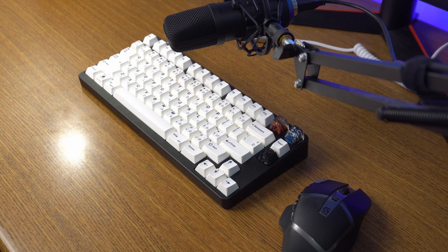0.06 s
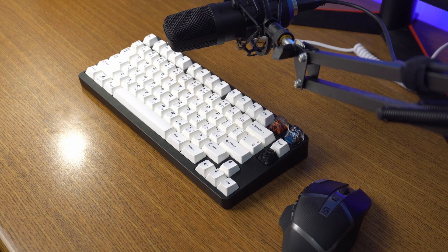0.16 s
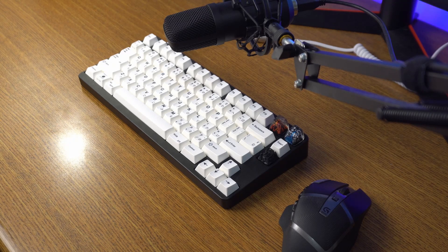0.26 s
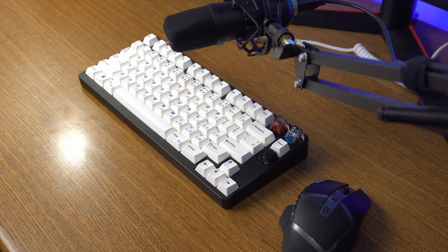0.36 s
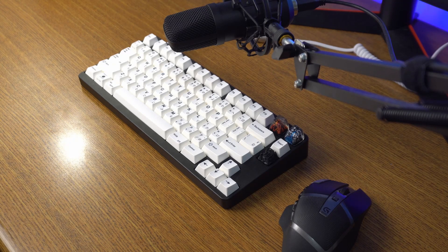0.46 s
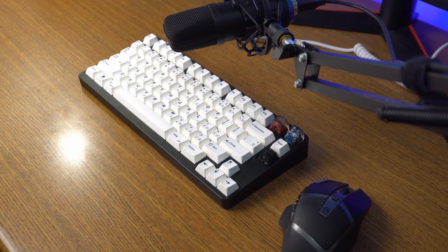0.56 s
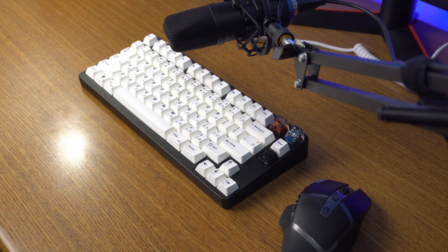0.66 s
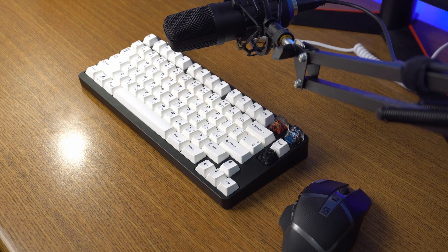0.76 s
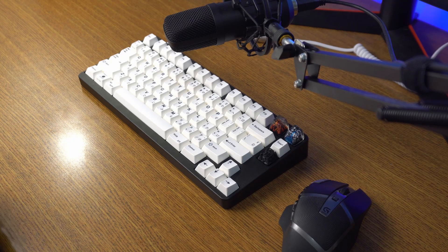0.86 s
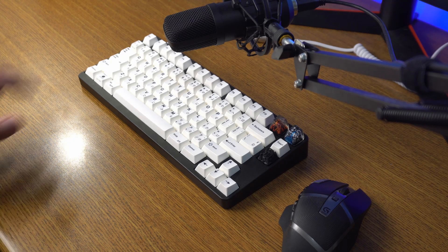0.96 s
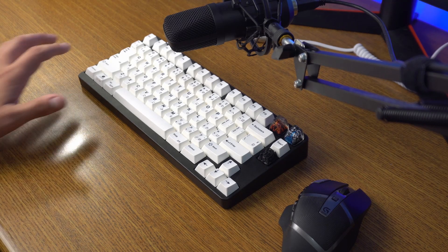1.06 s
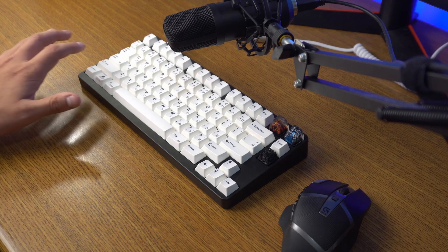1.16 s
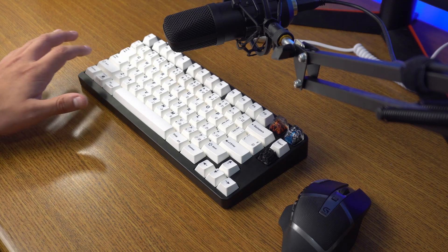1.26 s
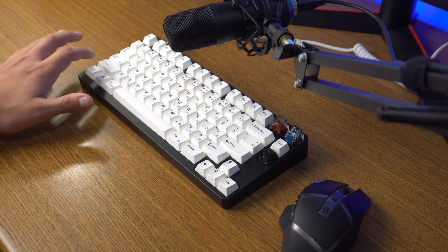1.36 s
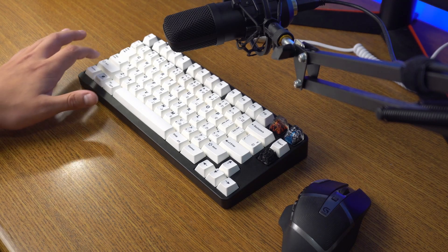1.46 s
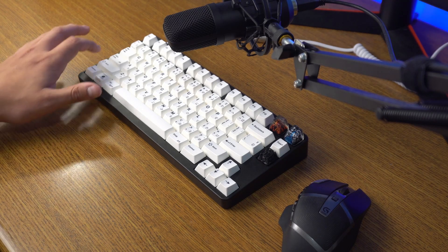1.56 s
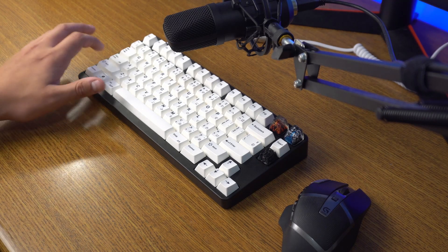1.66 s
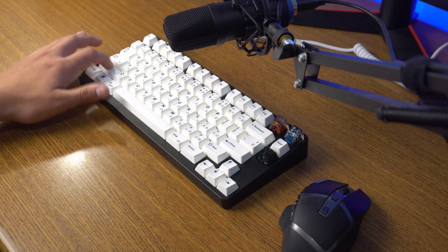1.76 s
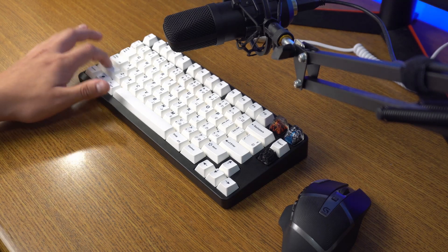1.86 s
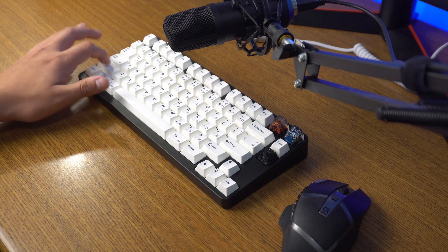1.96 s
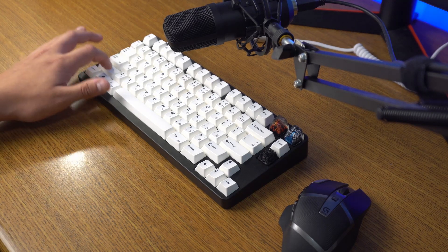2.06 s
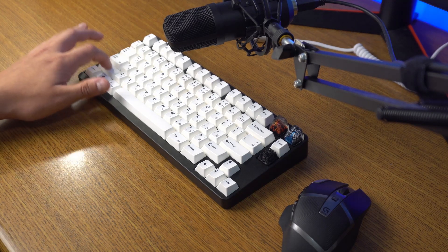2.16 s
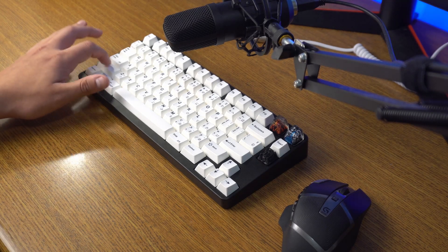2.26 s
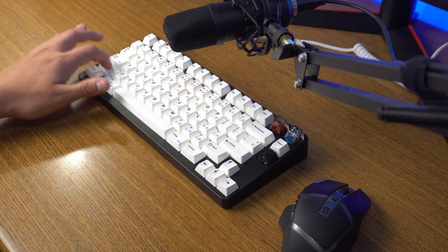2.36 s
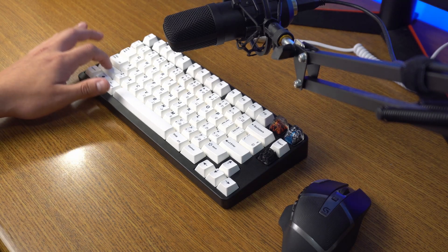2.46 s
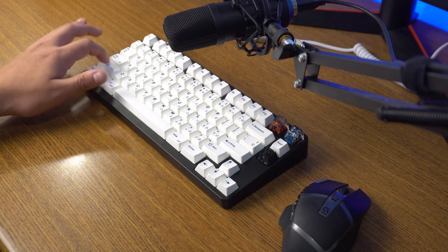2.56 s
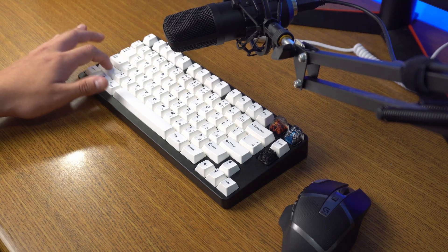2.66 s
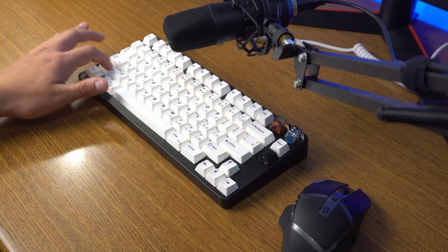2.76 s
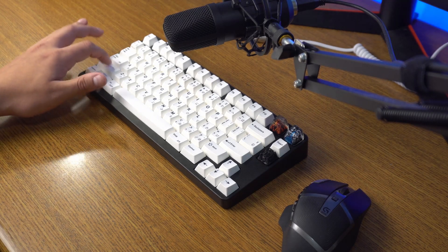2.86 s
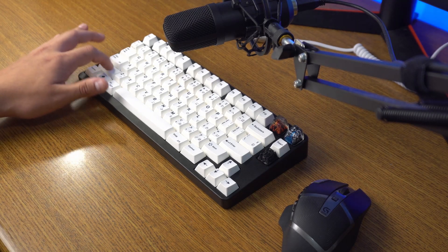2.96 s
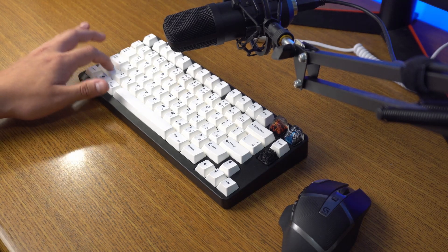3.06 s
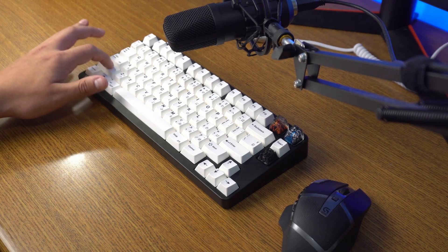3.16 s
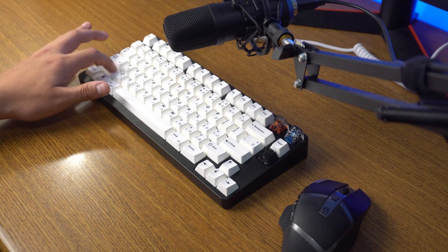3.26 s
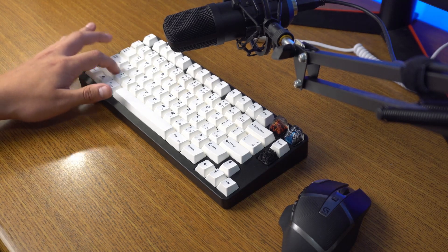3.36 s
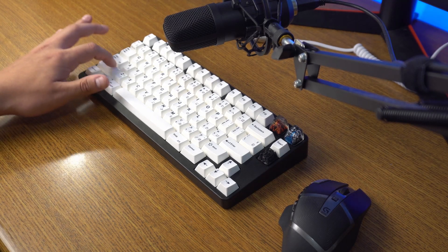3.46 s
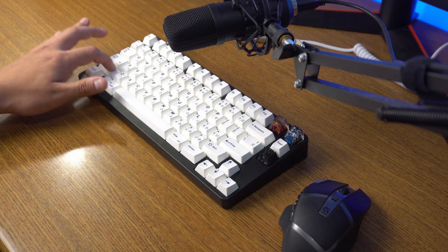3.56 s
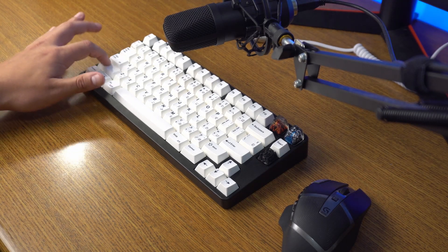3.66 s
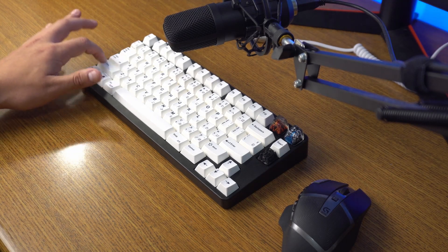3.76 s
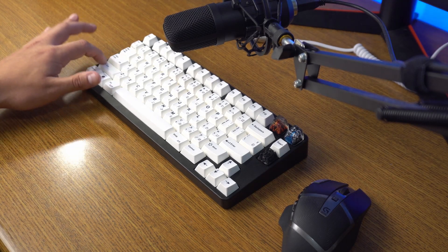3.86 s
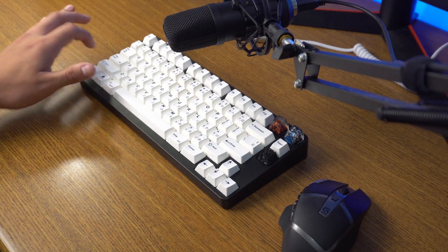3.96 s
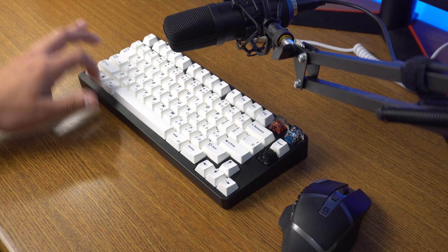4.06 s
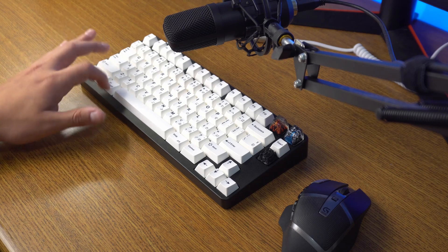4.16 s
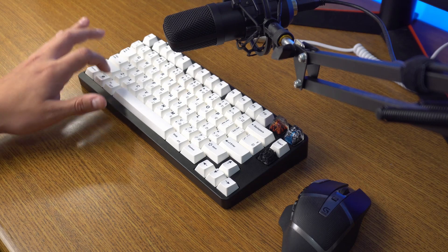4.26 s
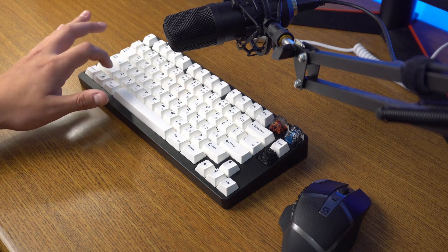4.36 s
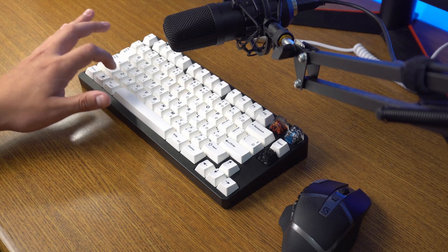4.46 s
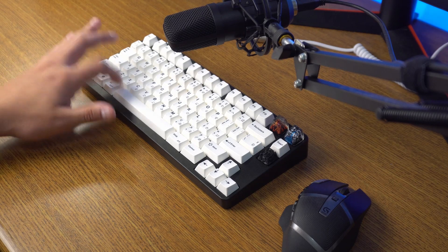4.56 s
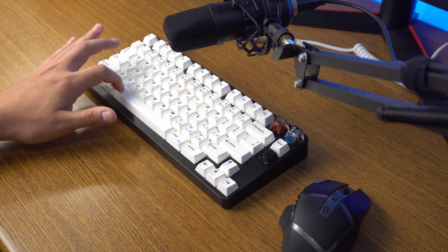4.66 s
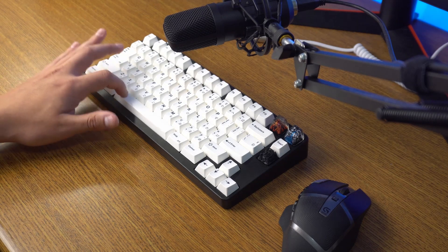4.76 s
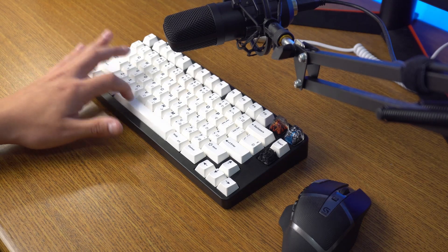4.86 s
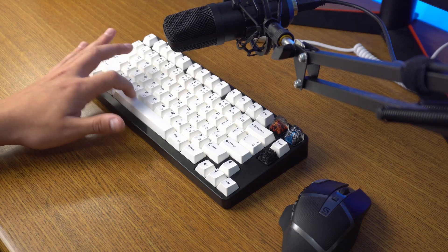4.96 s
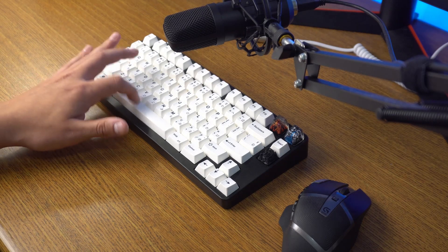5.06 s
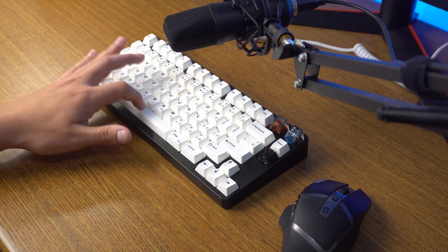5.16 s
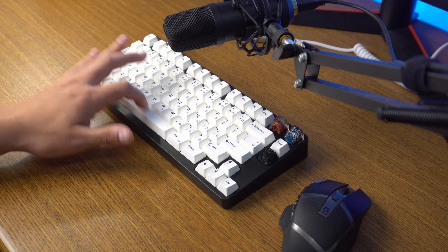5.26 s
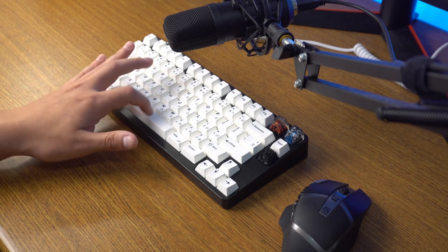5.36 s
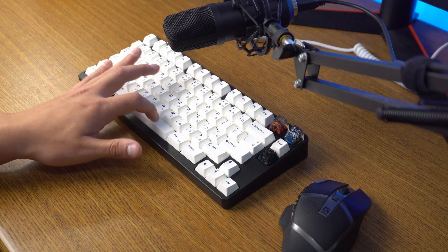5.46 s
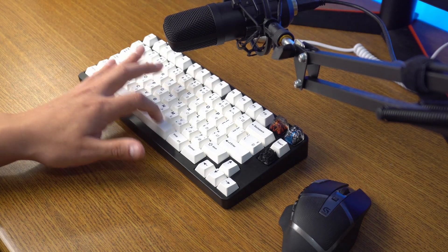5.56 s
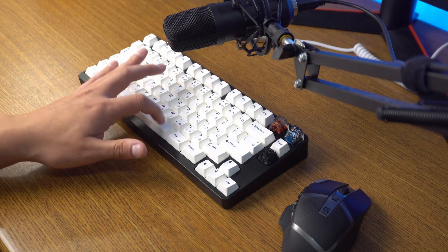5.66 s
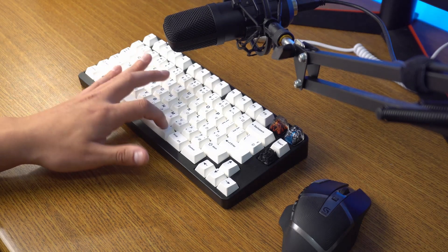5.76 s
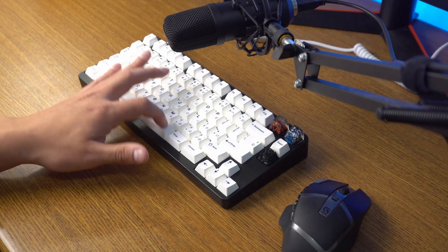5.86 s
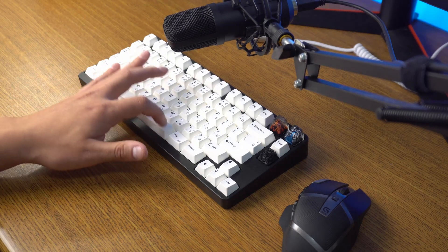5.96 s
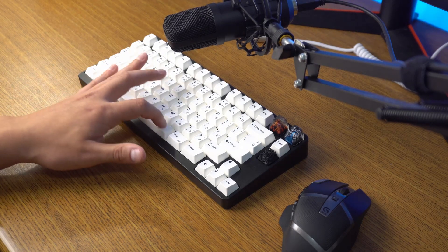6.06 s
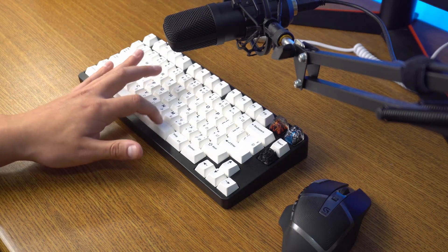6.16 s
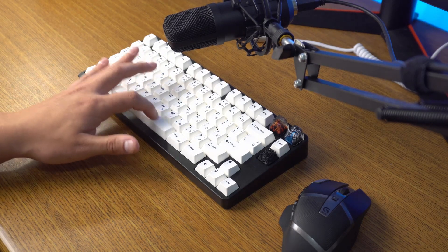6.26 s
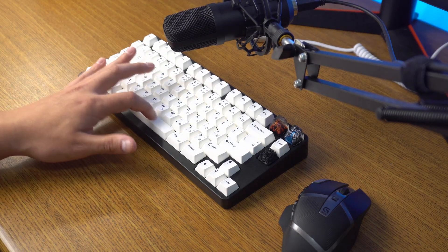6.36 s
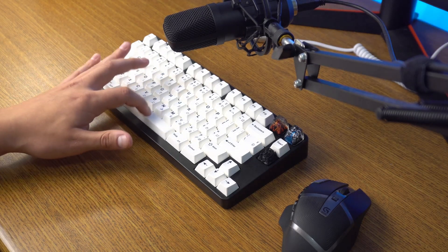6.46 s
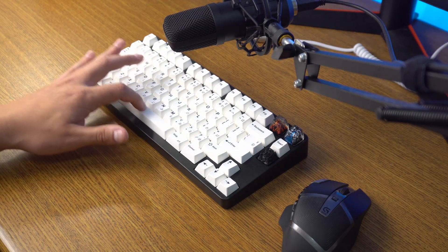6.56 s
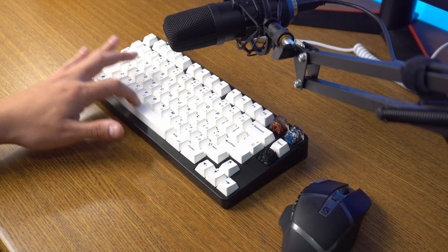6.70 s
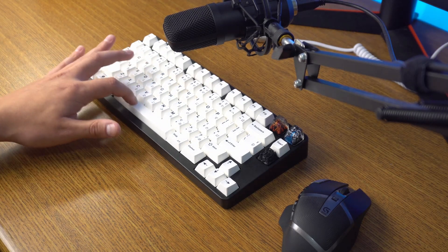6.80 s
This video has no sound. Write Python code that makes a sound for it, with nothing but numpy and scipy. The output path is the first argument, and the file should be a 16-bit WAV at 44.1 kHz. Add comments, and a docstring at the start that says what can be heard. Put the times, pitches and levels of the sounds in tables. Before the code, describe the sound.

One hand taps a mechanical keyboard close up, a steady run on a wide edge key, a short pause, then brisk letter keys with soft clacks.

```python
"""At a desk in a small room, close up: one hand taps a mechanical keyboard with linear switches.
A burst of strokes on a wide key at the edge comes first, then one on letter keys, about seven a second.
Fingertips rattle the caps on landing and lift; caps bottom out with a noise-burst clack, ringing plate and
case, and spring back. Shaped noise makes the rubbing, rustle, desk wobble and room air; sines hum faintly
and damped sines sway the desk; sparse random reflections make the room."""
import sys
import numpy as np
from scipy import signal
from scipy.fft import rfft, irfft
from scipy.io import wavfile
from scipy.ndimage import uniform_filter1d

SR = 44100
rng = np.random.default_rng(int(sys.argv[2]) if len(sys.argv) > 2 else 0)


def to_wav(s):
    """Save 16-bit WAV."""
    ch = np.atleast_2d(s).T  # columns
    pcm = np.round(np.clip(ch, -1, 1) * 32767)  # PCM
    wavfile.write(sys.argv[1], SR, pcm.astype(np.int16))


N = 301203
TIME = np.arange(N) / SR
AGE = np.arange(4096) / SR  # time axis of one blow, s
HIT_S = 0.02  # the level of a blow is its rms over this time
LETTERS_FROM_S = 4.3  # the hand moves from the wide key to the letters

# keys bottoming out: [t/s, relative cap level/dB, cap resonance f/Hz, plate level/dB,
# travel since the fingertip landed/s]
KEY_PRESSES = [(1.8047, -30.5, 1600, -37, .006), (1.9544, -39.5, 2620, -46, 0.023),
               (2.0955, -38.5, 2620, -43, 0.021), (2.2383, -38, 1970, -42, .018),
               (2.3849, -38, 1760, -42.5, 0.021), (2.5352, -38, 2720, -46, 0.02),
               (2.6925, -37, 1760, -43, 0.016), (2.829, -39, 1930, -40, 0.02),
               (2.9977, -36, 2800, -43, .019), (3.1386, -41.5, 1870, -41.5, 0.026),
               (3.292, -42, 1810, -39.5, 0.031), (3.4284, -37.5, 1920, -44.5, 0.028),
               (3.5894, -34, 1880, -41, 0.016), (3.757, -42, 2770, -51, 0.029),
               (3.8906, -38.5, 2820, -54, 0.02), (4.663, -35, 2750, -35.5, 0.01),
               (4.801, -39.5, 2700, -37, 0.011), (4.9443, -35.5, 2780, -38, 0.02),
               (5.0847, -35.5, 1830, -38, 0.017), (5.232, -26, 2020, -40, 0.0081),
               (5.3766, -35, 2640, -41.5, 0.022), (5.5194, -35.5, 2520, -39.5, 0.011),
               (5.6746, -36.5, 2770, -38.5, 0.011), (5.8155, -35.5, 2650, -38.5, 0.021),
               (5.9663, -37, 3000, -38.5, 0.023), (6.1129, -36.5, 2830, -37, 0.026),
               (6.2595, -38.5, 2980, -39, 0.013), (6.4037, -40.5, 2740, -40, 0.012),
               (6.5538, -38, 2800, -40.5, 0.028), (6.6957, -40, 1850, -42.5, 0.032)]
# keys springing back to the top stop: [t/s, relative cap level/dB, relative tick level/dB,
# travel since the finger let go/s]
KEY_RELEASES = [(1.873, -50, -54, 0.018), (2.021, -58.5, -73, 0.022), (2.1617, -50.5, -57, 0.014),
                (2.316, -54, -60, 0.023), (2.462, -52.5, -72, 0.016), (2.6087, -50.5, -50, 0.017),
                (2.917, -57.5, -70, .029), (3.0682, -55.5, -74, 0.015), (3.2216, -58.5, -73, .023),
                (3.3589, -52, -57, 0.017), (3.503, -49.5, -54.5, 0.017), (3.6679, -51.5, -66, 0.011),
                (3.833, -66, -88, .024), (3.9625, -46, -42, 0.016), (4.7228, -47, -64, 0.012),
                (4.8603, -44, -53.5, 0.014), (5.0048, -42.5, -52, 0.0091), (5.144, -41, -47, 0.0094),
                (5.2882, -41.5, -38.5, 0.014), (5.4425, -42.5, -57, 0.011), (5.584, -40.5, -56, .011),
                (5.737, -42, -50, 0.015), (5.8842, -40, -51.5, 0.014), (6.0353, -44, -56.5, 0.019),
                (6.1849, -45, -63, 0.015), (6.3176, -52, -62, 0.01), (6.4614, -52, -69, 0.013),
                (6.4769, -46.5, -66, 0.017), (6.625, -61, -65, .014), (6.776, -45.5, -59.5, 0.012)]
# modes of the switch plate, before detuning and sustain: [f/Hz, relative level/dB, t60/s]
PLATE_MODES = [(1074, -1.5, 0.038), (1208, -2.5, 0.026), (1325, -5.5, 0.043)]

# cap levels of an ordinary stroke, dB; pairs are (wide key, letter key) throughout
PRESS_DB, RELEASE_DB = -37.5, (-52, -40)


def amp(db):
    """Turns decibels into a linear gain."""
    return 10 ** (np.asarray(db) / 20)


def read(points, hz):
    """Joins (Hz, value) points on a log-frequency axis."""
    f, value = np.transpose(points)
    return np.interp(np.log(hz + 1), np.log(f + 1), value)


def unit(x):
    """Scales to energy 1."""
    return x / (np.linalg.norm(x) + 1e-20)


def sized(x, db):
    """Brings one blow to its level."""
    return unit(x) * amp(db) * np.sqrt(HIT_S * SR)


def add(mix, s, sound):
    """Lays a sound into the mix from time s, cut at the end."""
    part = mix[round(s * SR):][:len(sound)]
    part += sound[:len(part)]


def coloured(x, db):
    """Minimum-phase filter, so the energy stays early, with a gain in dB for each frequency bin."""
    log_gain = np.log(amp(np.r_[db, db[-2:0:-1]]))
    response = np.exp(np.conj(signal.hilbert(log_gain)))[:len(db)]
    return irfft(rfft(x) * response)


def noise(colour):
    """Noise of rms 1 with a given spectrum."""
    spectrum = rfft(rng.standard_normal(N))
    gain = amp(read(colour, np.fft.rfftfreq(N, 1 / SR)))
    return unit(irfft(spectrum * gain, N)) * np.sqrt(N)


def level(rows):
    """Gain over time from (s, dB) rows, silent outside them."""
    s, db = np.transpose(rows)
    return amp(np.interp(TIME, s, db, left=-200, right=-200))


def for_key(pair, s):
    """Picks the value for the key in use at time s."""
    return pair[int(s > LETTERS_FROM_S)]


def of_key(table, s):
    """Picks the colour of the key in use at time s."""
    return np.array(table)[:, [0, for_key((1, 2), s)]]


def hum():
    """Mains hum: steady sines with random starting phases."""
    # [f/Hz, rms level/dB]
    hum_tones = [(60, -67.5), (120, -67), (240, -75.5)]
    out = np.zeros(N)
    for hz, db in hum_tones:
        out += amp(db) * np.sqrt(2) * np.sin(2 * np.pi * (hz * TIME + rng.random()))
    return out


def air():
    """Room air: a steady bed of shaped noise."""
    # [f/Hz, relative level/dB]
    air_colour = [(90, -8), (160, -12.5), (270, -6), (335, -15.5), (470, -13), (800, -23.5), (1500, -28),
                  (4000, -36), (16000, -38)]
    return amp(-66.5) * noise(air_colour)


def wobble():
    """Desk and microphone arm wobble: low noise that swells and sinks."""
    # [t/s, relative level/dB]
    wobble_course = [(0, -61.5), (1.2, -56.5), (1.72, -63), (1.82, -45.5), (2.4, -51.5), (3.95, -51),
                     (4.55, -55.5), (4.68, -45.5), (6.83, -55.5)]
    # [f/Hz, relative level/dB]
    wobble_colour = [(10, 3), (20, 4), (27, -10.5), (36, -12.5), (50, -7.5), (64, -11), (90, -13),
                     (130, -26.5), (250, -75.5)]
    return amp(2.4) * noise(wobble_colour) * level(wobble_course)


def background():
    """Sums desk wobble, room air and mains hum."""
    return wobble() + air() + hum()


def room(x, first_s=0.0046):
    """Sparse reflections of random sign and size, each band dying at its own speed."""
    # [f/Hz, t60/s]
    room_decay = [(300, 0.62), (1500, 0.32), (4000, 0.34), (8000, 0.37), (15000, 0.19)]
    t = np.arange(SR // 2) / SR
    # reflections per second grow with time, and each gets weaker to match
    density = 900 + 40000 * t
    struck = (rng.random(len(t)) < density / SR) * (t > first_s)
    taps = rng.standard_normal(len(t)) * struck / np.sqrt(density)
    hz, age, bands = signal.stft(taps, SR, nperseg=256)
    decay = amp(-60 * age / read(room_decay, hz)[:, None])
    tail = signal.istft(bands * decay, SR, nperseg=256)[1]
    return signal.fftconvolve(x, unit(tail))[:N]


def reflections(x, count=4):
    """Successive strokes cycle through a few random reflection patterns, so the room tail varies."""
    stroke = np.searchsorted([press[0] - HIT_S for press in KEY_PRESSES], TIME)
    return sum(room(x * (stroke % count == k)) for k in range(count))


def desk():
    """Every press pushes the desk, which sways on in slow dying modes."""
    # before detuning: [f/Hz, relative level/dB, t60/s]
    desk_modes = [(28.3, -51.5, 0.28), (61.3, -55, .25)]
    t, out = np.arange(SR // 2) / SR, np.zeros(N)
    for press in KEY_PRESSES:
        force, detune = rng.standard_normal(2)
        sway = np.zeros(len(t))
        for hz, db, t60 in desk_modes:
            sway += amp(db - 60 * t / t60) * np.sin(2 * np.pi * hz * (1 + 0.12 * detune) * t)
        add(out, press[0], amp(12.0 + 1.6 * force) * sway * (1 - np.exp(-t / 0.0016)))
    return out


def contact(chatter_db, t60, crack_s, spread=0.37):
    """A sharp crack, then the small fast rebounds of plastic on plastic."""
    crack_noise, chatter_noise = rng.standard_normal((2, len(AGE)))
    crack = (AGE == 0) + spread * crack_noise * np.exp(-AGE / crack_s)
    chatter = chatter_noise * amp(-60 * AGE / t60) * (1 - np.exp(-AGE / 0.00076))
    return unit(crack) + amp(chatter_db) * unit(chatter)


def keycap(s, cap_db, tick_db, chatter_db, t60, cap_hz, peak_db, width_hz=200, tick_chatter_db=-2):
    """The contact rings the hollow cap; its hard edge gives a shorter tick."""
    # colour of the cap: [f/Hz, wide key level/dB, letter key level/dB]
    cap_colour = [(835, -45.5, -34.5), (1004, -5, -9.5), (1430, -5, -7.5), (1920, -1.5, -3),
                  (2220, -3, -3.5), (2470, -7, -3.5), (3000, -3.5, -2), (3520, -6, -9.5), (4433, -14.5, -9),
                  (5560, -35.5, -36)]
    # colour of the hard plastic contact: [f/Hz, wide key level/dB, letter key level/dB]
    tick_colour = [(2800, -9, -23), (3960, 2, -0.5), (5510, -0.5, -1.5), (5260, -3.5, -7), (7180, -5.5, -1),
                   (9330, -9, -5.5), (10000, -6.5, -14), (11240, -18, -4.5), (11700, -17.5, -14),
                   (15100, -22.5, -12), (16200, -29.5, -23)]
    hz = np.fft.rfftfreq(len(AGE), 1 / SR)
    cavity = peak_db / (1 + ((hz - cap_hz) / width_hz) ** 2)
    # a wide key lands on its stem and stabilisers not quite at once, so its crack lasts longer
    crack_s = for_key((0.0006, 0.00025), s)
    cap_contact = contact(chatter_db, t60, crack_s)
    clack = coloured(cap_contact, read(of_key(cap_colour, s), hz) + cavity)
    edge_contact = contact(chatter_db + tick_chatter_db, t60 * 0.92, crack_s)
    tick = coloured(edge_contact, read(of_key(tick_colour, s), hz))
    return sized(clack, cap_db) + sized(tick, tick_db)


def ring(modes, rise_s, scatter_db=2):
    """Dying modes, excited and tuned a little differently on each blow."""
    hz, db, t60 = np.transpose(modes)[:, :, None]
    weight, detune = rng.standard_normal((2, len(modes), 1))
    envelopes = amp(db + scatter_db * weight - 60 * AGE / t60)
    waves = envelopes * np.sin(2 * np.pi * hz * (1 + 0.016 * detune) * AGE)
    return unit(waves.sum(0) * (1 - np.exp(-AGE / rise_s)))


def plate(hz, delay_s, ring_db, sustain=1, focus_db=0, width_s=0.0016, fall=0.12):
    """A bending wave crosses the plate, high notes first, and leaves its modes ringing."""
    passing = (AGE - delay_s) / width_s
    turns = np.cumsum(hz * (1 - fall * np.tanh(passing / 2))) / SR
    swell = (1 - np.exp(-AGE / 0.000302)) / np.cosh(np.clip(passing, -20, 20))
    wave = np.sin(2 * np.pi * turns) * swell
    # focus_db weakens modes per octave of distance from the wave's pitch
    modes = [(f, db - focus_db * abs(np.log2(f / hz)), t60 * sustain) for f, db, t60 in PLATE_MODES]
    late = np.interp(AGE - delay_s, AGE, ring(modes, 0.0027), left=0)
    return unit(wave) + amp(ring_db) * unit(late)


def case(s, rise_s, low_hz=365, high_hz=740):
    """The case on the desk thuds: its dying modes build up briefly and pass one narrow band."""
    # before detuning: [f/Hz, wide key level/dB, letter key level/dB, t60/s]
    case_modes = [(412, -5, -1.5, 0.051), (445, -13, 1, 0.02), (533, -3.5, -1.5, 0.032),
                  (675, 6.5, 2, 0.02)]
    hz, wide_db, letter_db, t60 = np.transpose(case_modes)
    modes = np.transpose([hz, for_key((wide_db, letter_db), s), t60])
    band = signal.butter(2, [low_hz, high_hz], "bandpass", fs=SR, output="sos")
    return signal.sosfilt(band, ring(modes, rise_s))


def push(soft_s=0.00097):
    """The dull, ringless shove of the finger's weight on the case."""
    u = AGE / soft_s
    return u * (2 - u) * np.exp(-u)


def rattle(s, cap_db, tick_db):
    """A loose cap rattles on its stem and faintly stirs the plate."""
    # the stabilised wide key rattles briefly, a letter cap for longer
    t60, chatter_db = for_key((0.023, 0.03), s), for_key((3.5, 13), s)
    cap = keycap(s, cap_db - 1.3, tick_db - 1.3, chatter_db, t60, cap_hz=3090, peak_db=11.0)
    return cap + sized(ring(PLATE_MODES, 0.000948), cap_db - 14.5)


def approach():
    """A faint shaped-noise rustle and one dry contact tick as the hand comes in."""
    # [t/s, level/dB]
    rustle_course = [(.6, -90), (.8, -79), (1.05, -79), (1.35, -77), (1.6, -90)]
    # [f/Hz, relative level/dB]
    rustle_colour = [(200, -13), (600, 3), (1200, -6), (2600, -14), (5000, -18), (15000, -24)]
    # [f/Hz, relative level/dB]
    dry_tick_colour = [(400, -18), (900, 2), (2000, -8), (6000, -4), (15000, -10)]
    out = noise(rustle_colour) * level(rustle_course)
    hz = np.fft.rfftfreq(len(AGE), 1 / SR)
    tick = coloured(contact(chatter_db=3, t60=0.03, crack_s=0.00054), read(dry_tick_colour, hz))
    add(out, 1.254, sized(tick, -66))
    return out


def fingers(grain_db=3, drag_grain_db=3.0):
    """Grainy rubbing of stems and fingers as keys go down and are held, and one duller drag over a cap."""
    # rubbing level over the two bursts of strokes: [t/s, relative level/dB]
    rub_course = [(1.79, -64), (2.7, -63.5), (3.15, -67.5), (3.65, -65.5), (3.97, -64), (4.7, -75),
                  (5.25, -64.5), (5.9, -71), (6.82, -73)]
    # rubbing within each stroke: [t from the press/s, relative level/dB]
    stroke_course = [(-.035, -29), (-.015, 6.5), (.01, 3.5), (.07, 1.5), (.11, -14.5)]
    # [f/Hz, relative level/dB]
    rub_colour = [(300, -2.5), (850, -14.5), (1250, -14.5), (1700, -3.5), (2200, -8.5), (2600, -12),
                  (3100, -9.5), (4500, -9.5), (8000, -20), (15000, -28.5)]
    # [t/s, relative level/dB]
    drag_course = [(5.9, -63.5), (5.975, -50.5), (6.02, -54), (6.07, -58), (6.13, -63)]
    # [f/Hz, relative level/dB]
    drag_colour = [(120, -9), (300, -6), (700, -7.5), (1300, -13), (2200, -22), (5000, -53)]
    # the grain flutters the level over about 3 ms
    grain = unit(uniform_filter1d(rng.standard_normal(N), size=130)) * np.sqrt(N)
    age, db = np.transpose(stroke_course)
    stroke = amp(np.interp(np.arange(age[0], age[-1], 1 / SR), age, db))
    moving = np.zeros(N)
    for press in KEY_PRESSES:
        add(moving, press[0] + age[0], stroke)
    rub = noise(rub_colour) * amp(grain_db * grain + 1.5) * level(rub_course) * moving
    drag = noise(drag_colour) * amp(drag_grain_db * grain - 0.5) * level(drag_course)
    return rub + drag


def touches(land_follows=0.9, lift_follows=(0.15, 0.55)):
    """Caps rattle as fingertips land and let go, following each stroke's force, and when flicked sideways."""
    # caps flicked on their stems: [t/s, relative cap level/dB, relative tick level/dB]
    flicks = [(2.743, -54.5, -55), (2.7576, -58, -58), (2.902, -56, -59), (3.3407, -56, -48.5)]
    land_cap_db, land_tick_db = (-54, -57), (-49.5, -63)
    lift_cap_db, lift_tick_db = (-55.5, -52), (-57, -59.5)
    # the fingertip lands harder after a pause
    first_land_db, burst_gap_s = (3, 15.5), 0.3
    out, last_s = np.zeros(N), 0
    for s, cap_db, _, _, travel_s in KEY_PRESSES:
        gain_db = land_follows * (cap_db - PRESS_DB)
        if s - last_s > burst_gap_s:
            gain_db += for_key(first_land_db, s)
        landing = rattle(s, for_key(land_cap_db, s), for_key(land_tick_db, s))
        add(out, s - travel_s, amp(gain_db) * landing)
        last_s = s
    for s, cap_db, _, travel_s in KEY_RELEASES:
        gain_db = for_key(lift_follows, s) * (cap_db - for_key(RELEASE_DB, s))
        lift = rattle(s, for_key(lift_cap_db, s), for_key(lift_tick_db, s))
        add(out, s - travel_s, amp(gain_db) * lift)
    for s, cap_db, tick_db in flicks:
        add(out, s, rattle(s, cap_db, tick_db))
    return out


def releases(follows=0.92):
    """Springs throw the caps back up: a softer, looser knock; plate and case follow the cap's force."""
    plate_level_db, plate_pitch_hz = (-54.5, -47.5), (1280, 1230)
    thud_level_db, chatter_level_db = (-54, -57), (-1, 17)
    out = np.zeros(N)
    for s, cap_db, tick_db, _ in KEY_RELEASES:
        force_db = follows * (cap_db - for_key(RELEASE_DB, s))
        chatter_db = for_key(chatter_level_db, s)
        add(out, s, keycap(s, cap_db - 3, tick_db - 3, chatter_db, t60=0.022, cap_hz=3300, peak_db=6.5))
        wave = plate(for_key(plate_pitch_hz, s), delay_s=0.00291, ring_db=-2.5)
        add(out, s, sized(wave, for_key(plate_level_db, s) + force_db))
        add(out, s, sized(case(s, 0.00024), for_key(thud_level_db, s) + force_db))
    return out


def presses():
    """Keys hit the bottom of their travel, ringing cap, plate and case; tick and thud grow with the force."""
    # the spot under the hand shifts along the board:
    # [t/s, case thud level at ordinary force/dB, mean plate wave f/Hz, mean plate wave delay/s]
    hand_spot = [(1.8, -55, 1248, 0.0029), (2.4, -57.5, 1221, 0.0035), (2.85, -50, 1267, 0.00442),
                 (3.28, -48.5, 1202, 0.0046), (3.6, -52, 1285, 0.0032), (3.9, -51.5, 1310, 0.0033),
                 (4.66, -45, 1304, 0.00351), (5.1, -45, 1353, 0.0045), (5.45, -43.5, 1300, 0.0053),
                 (5.95, -47.5, 1305, 0.0042), (6.7, -44.5, 1292, 0.0052)]
    tick_level_db, chatter_level_db = (-42.5, -46), (-4.5, -5)
    thud_follows = (0.13, 0.51)  # dB per dB of force
    plate_sustain = (1.6, 0.63)  # factor on the plate's decay times
    out = np.zeros(N)
    spot_s, *spot = np.transpose(hand_spot)
    for s, cap_db, cap_hz, plate_db, _ in KEY_PRESSES:
        force_db = cap_db - PRESS_DB
        thud_db, plate_hz, delay_s = [np.interp(s, spot_s, column) for column in spot]
        thud_db += for_key(thud_follows, s) * force_db
        tick_db = for_key(tick_level_db, s) + force_db
        # a harder press cracks more cleanly and rings the hollow of the cap more
        chatter_db = for_key(chatter_level_db, s) - 0.26 * force_db
        peak_db = 7.0 + 0.34 * force_db
        add(out, s, keycap(s, cap_db + 2, tick_db + 2, chatter_db, 0.02, cap_hz, peak_db))
        # the bending wave's pitch and delay vary a little from stroke to stroke
        detune, shift = rng.uniform(-1, 1, 2)
        plate_hz *= 1 + 0.016 * detune
        delay_s *= 1 + 0.078 * shift
        wave = plate(plate_hz, delay_s, ring_db=-6.5, sustain=for_key(plate_sustain, s), focus_db=35.5)
        add(out, s, sized(wave, plate_db))
        add(out, s, sized(case(s, 0.0001), thud_db) + sized(push(), thud_db - 6.0))
    return out


def scene():
    """Mixes the keys and their reflections with the hand's approach, the desk and the background."""
    keys = presses() + releases() + touches() + fingers()
    return (keys + amp(-18) * reflections(keys) + approach() + desk() + background())[None]


def record(dry):
    """Band limit of the recorder: a steep low-pass at 16.4 kHz."""
    low_pass = signal.firwin(301, 16400, window=("kaiser", 9), fs=SR)
    return signal.oaconvolve(dry, low_pass[None], "same")


dry = scene()
out = record(dry)
to_wav(out)
```